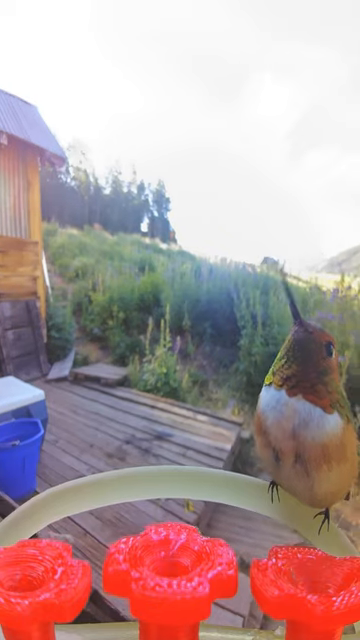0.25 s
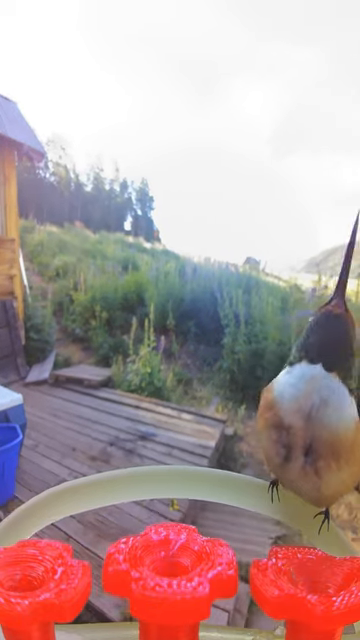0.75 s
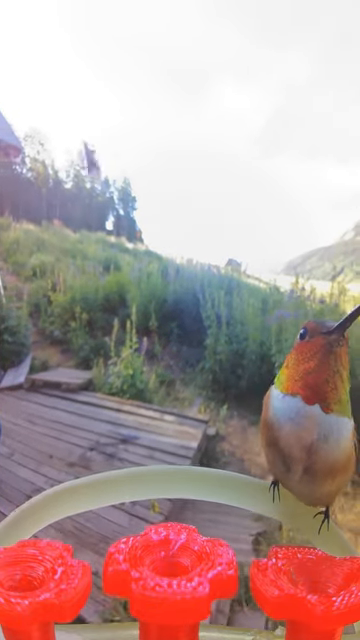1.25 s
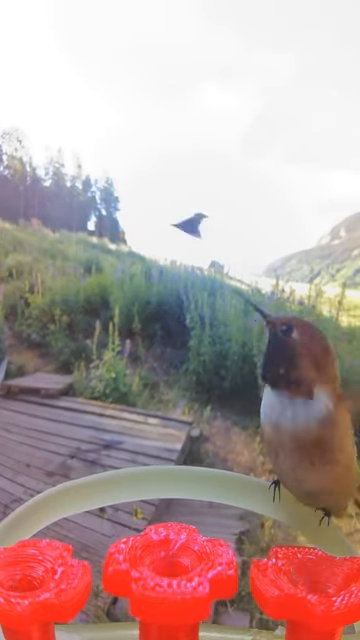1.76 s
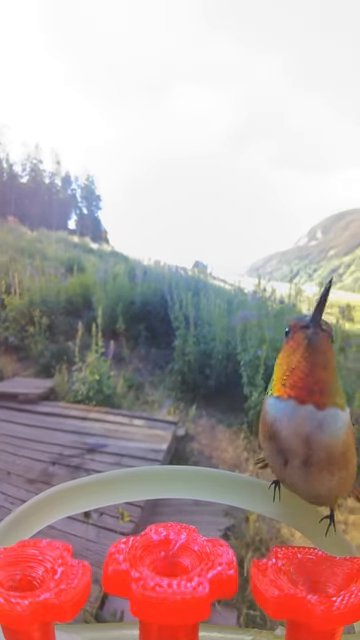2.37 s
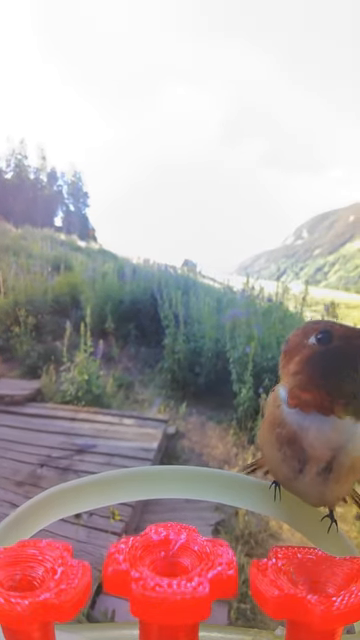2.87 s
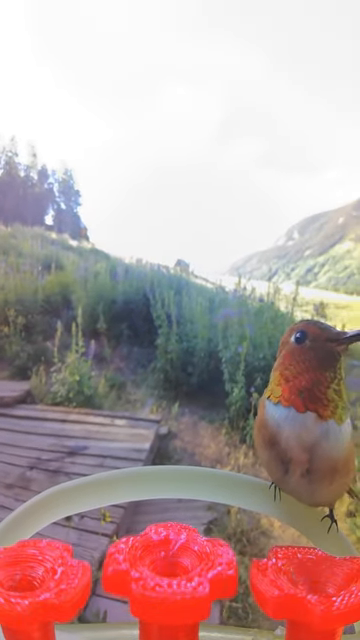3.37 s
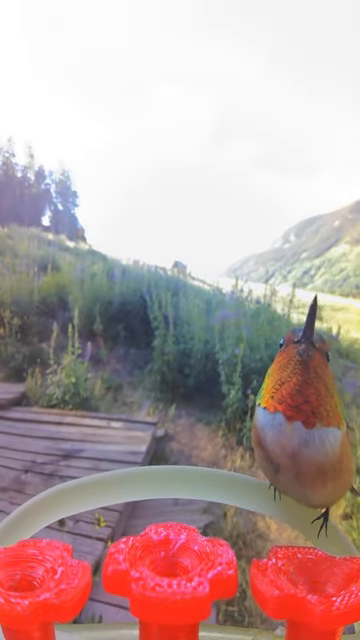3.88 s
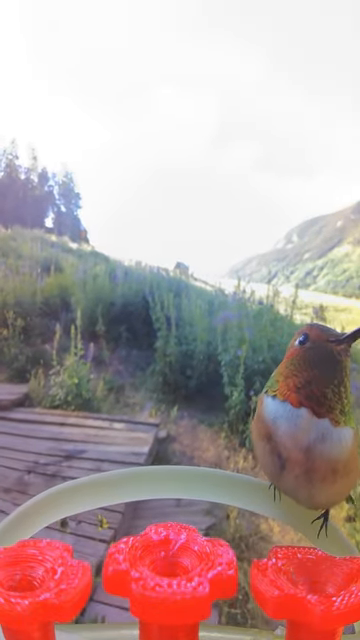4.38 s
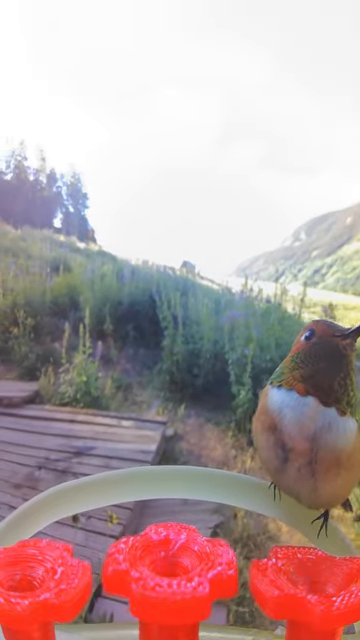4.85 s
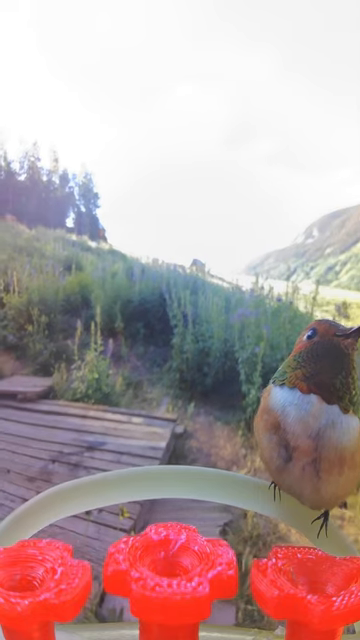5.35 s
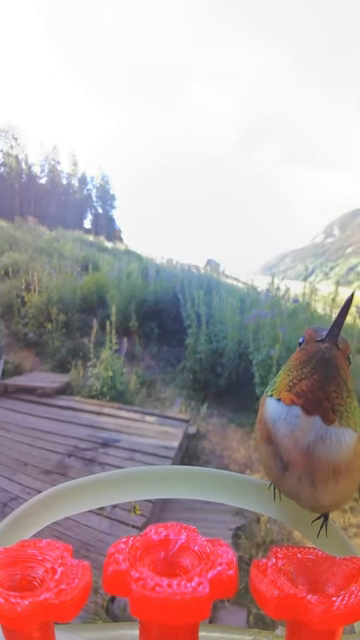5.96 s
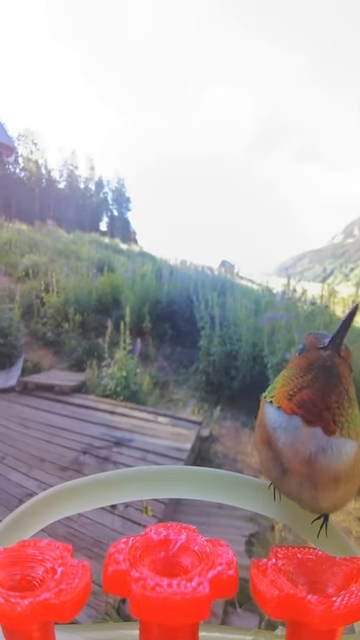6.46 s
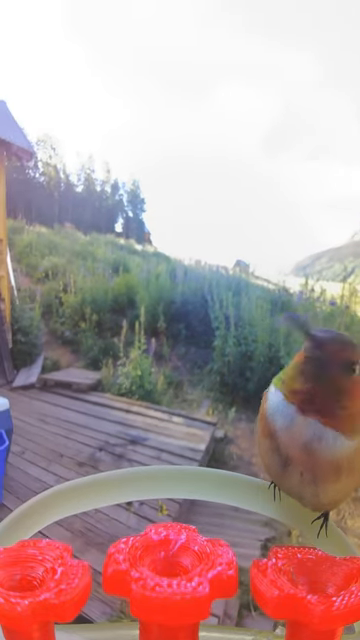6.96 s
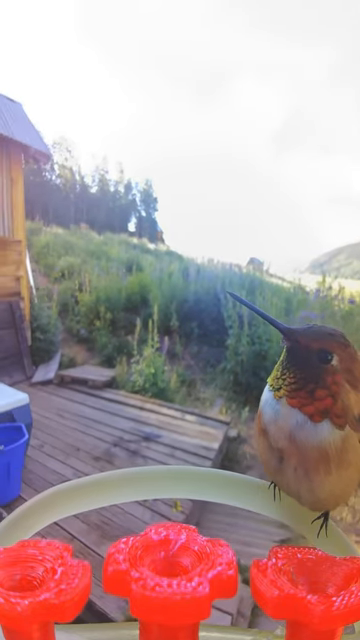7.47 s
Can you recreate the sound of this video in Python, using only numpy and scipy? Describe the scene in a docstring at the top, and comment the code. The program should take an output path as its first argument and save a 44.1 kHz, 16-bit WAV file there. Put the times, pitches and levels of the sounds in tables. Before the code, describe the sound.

A hummingbird perched close by bursts into a piercing trill, buzzes, rattling ticks and falling chirps as rivals whir past, then quiet garden chips remain.

```python
"""Distant chips and high, pulsing wing whistles come first: rival hummingbirds flying around a garden feeder.
The bird perched by the microphone then gives a trill and a burst of buzzes, whistles, ticks and falling chirps:
one syrinx tone sweeping through a fixed throat resonance. Close rivals whistle one pip a wingbeat and push a
fluttering draught of air; others fly and call farther off, with more echo, over a faint background hiss."""
import sys
import numpy as np
from scipy import signal
from scipy.fft import rfft, irfft, next_fast_len
from scipy.io import wavfile
from scipy.ndimage import uniform_filter1d, map_coordinates

SR = 44100
rng = np.random.default_rng(int(sys.argv[2]) if len(sys.argv) > 2 else 0)


def generate_wav(sig):
    """Save sig (samples, or channels by samples) to the path in sys.argv[1] as 16-bit PCM at SR."""
    pcm = np.round(np.clip(np.atleast_2d(sig).T, -1, 1) * 32767).astype(np.int16)
    wavfile.write(sys.argv[1], SR, pcm)


N = 340452
T = np.arange(N) / SR

# The close trill, starting at the bottom of a warble swing: t/s, f/Hz, effort level/dB, warble depth f/Hz
TRILL = [(1.8385, 7900, -26, 1500), (1.8485, 8100, -14, 1550), (1.868, 8250, -9.5, 1550),
         (1.90, 8350, -10, 1550), (1.99, 8400, -10, 1450), (2.02, 8200, -14, 1500),
         (2.033, 7950, -19, 1550)]
# Syllables that curve through the high register, then break and plunge: break t/s, lead before it t/s,
# tail after it t/s, start f/Hz, top f/Hz, f/Hz at the break, place of the top (0-1),
# warble depth f/Hz at the top, effort level/dB
SYLLABLES = [(2.1205, .0115, 0.025, 7010, 5890, 4600, 0.34, -1.5, -9.5),
             (2.1895, 0.033, 0.0016, 2212, 5900, 5700, 0.81, 1049.5, -10.5),
             (2.2849, 0.051, 0.028, 6300, 7660, 6300, 0.54, 1149.5, -11),
             (2.4796, 0.049, 0.0073, 6780, 6848, 5100, .36, 31, -11.5),
             (2.6268, .0205, .018, 7200, 7270, 6080, 0.4, 800, -11),
             (2.861, 0.044, 0.0021, 6620, 6780, 5200, .4, 60, -10.5),
             (3.0669, 0.07, 0.0042, 6513, 7630, 6000, .44, 950.5, -11.5)]
# Chirps that flick up from the low register and sag: top t/s, lead t/s, tail t/s, top f/Hz, low f/Hz,
# flick width t/s, effort level/dB
CHIRPS = [(2.153, 0.013, .008, 5230, 1756, .005, -10), (2.3753, 0.0033, 0.034, 3640, 1834, .0037, -11),
          (2.652, 0.014, 0.028, 2810, 1858, 0.006, -10), (2.761, .003, 0.03, 3310, 1843, 0.0044, -15.5),
          (3.1232, 0.0052, 0.041, 4018, 1960, 0.0028, -8.5)]
# Ticks of the two rattles: t/s, effort level/dB before tick_db
TICKS = [(2.5253, -21.5), (2.534, -7.5), (2.544, -6), (2.5545, -7.5), (2.9106, -23.5), (2.9174, -7),
         (2.9294, -7), (2.9399, -5), (2.95, -10)]
# Dry clicks between syllables: t/s, level/dB before click_db
CLICKS = [(2.028, -37), (2.224, -37), (2.228, -35), (2.498, -34), (2.924, -33), (2.96, -38), (2.99, -32),
          (2.993, -54), (3.109, -31)]
# Spectrum of the rasp, also lent to the wing swish: f/Hz, level/dB
RASP_COLOUR = [(800, -63.5), (1350, -40), (2000, -10), (3500, -6.5), (5000, 0.5), (6800, -4), (8500, -13),
               (11000, -15.5), (15000, -24)]


def perched_bird(tick_db=2, rasp_db=-14, click_db=1, harsh_hz=5900, whistle_rasp=0.23):
    """The close voice, with noise that follows its loudness and bites hardest below harsh_hz."""
    trill, chatter, clicks = np.zeros((3, N))
    trill_call = warbled(*contour(TRILL), 100.0, warble_jitter=.007, lean=.08)
    add(trill, TRILL[0][0], trill_call)
    for s, lead, *shape in SYLLABLES:
        add(chatter, s - lead, syllable(lead, *shape))
    for s, lead, *shape in CHIRPS:
        add(chatter, s - lead, chirp(lead, *shape))
    for s, db in TICKS:
        add(chatter, s, tick(db + tick_db))
    for s, db in CLICKS:
        clicks += amp(db + click_db) * np.exp(-np.abs(T - s) / .0015)
    voice = throat(chatter)
    harsh = filtered(voice, lambda hz: whistle_rasp + 1 / (1 + (hz / harsh_hz) ** 20))
    rasp_level = amp(rasp_db) * envelope(harsh, size=520)
    rasp = (rasp_level + clicks) * noise(RASP_COLOUR)
    trill = throat(trill)
    # the bright trill glances off the feeder just behind the bird
    return voice + rasp + trill + garden(trill, wet_db=-10, t60=.03)


BREAK_S, BREAK_DB = 0.0011, 2  # time scale of the plunge; height of the push before it
ACCENT_S, ACCENT_LEAD_S = .002, .001  # length of that push and its lead on the break
TIRE_DB = 11.5  # a buzz weakens past its top, by this much times its relative depth
# the low register starts high by LOW_EXTRA_HZ and settles after the break
LOW_HZ, LOW_EXTRA_HZ, LOW_SETTLE_S, LOW_DB = 1777, 704, .006, -1.5


def syllable(lead, tail, start_hz, top_hz, brink_hz, top_at, depth, db, buzz_hz=303, calm_s=.006):
    """A high-register curve; the warble dies away, the voice breaks and lands in the low register."""
    t = np.arange(-lead, tail, 1 / SR)
    top_s = -lead * (1 - np.clip(top_at, .05, .95))
    # place on the curve: -1 at the start, 0 at the top, 1 at the break
    u = np.interp(t, [-lead, top_s, 0], [-1, 0, 1])
    high = top_hz - (top_hz - np.where(u < 0, start_hz, brink_hz)) * u ** 2
    low = LOW_HZ + LOW_EXTRA_HZ * np.exp(-np.maximum(t, 0) / LOW_SETTLE_S)
    broken = (1 + np.tanh(t / BREAK_S / 2)) / 2
    accent_db = BREAK_DB * np.exp(-((t + ACCENT_LEAD_S) / ACCENT_S) ** 2)
    tiring_db = TIRE_DB * depth / top_hz * np.clip(u, 0, 1) * (t < -calm_s)
    effort_db = db + edges_db(t) + LOW_DB * broken + accent_db - tiring_db
    calming = 1 - np.exp(-(np.minimum(t, 0) / calm_s) ** 2)
    warble = depth * (high / top_hz) ** 1.5 * calming
    pitch = high + (low - high) * broken
    return warbled(pitch, effort_db, warble, buzz_hz, warble_jitter=.02)


SAG_HZ_PER_S, FADE_DB_PER_S = 15000, 170


def chirp(lead, tail, top_hz, low_hz, width, db):
    """A quick flick of pitch on a low note that sags and fades."""
    t = np.arange(-lead, tail, 1 / SR)
    after = np.maximum(t, 0)
    flick = (top_hz - low_hz) / (1 + (t / width) ** 2)
    pitch = low_hz - SAG_HZ_PER_S * after + flick
    effort_db = db + edges_db(t) - FADE_DB_PER_S * after
    return warbled(pitch, effort_db, 0, 0, low_jitter=0.041)


def tick(effort_db, fall=0.002, fade_db=2.5):
    """The pitch plunges from above the throat resonance to the low register within a few ms."""
    t = np.arange(0, .006, 1 / SR)
    pitch = 2000 + 4500 * np.exp(-t / fall)
    return syrinx(pitch, effort_db - fade_db * t / fall, jitter=.035)


def warbled(pitch, effort_db, depth, warble_hz, jitter=0.0075, low_jitter=0.045, warble_jitter=.014, lean=.1):
    """One call: a pitch contour with a fast warble that dips sharply and lingers at the top."""
    t = np.arange(len(pitch)) / SR
    cycle = 2 * np.pi * warble_hz * t + .2 * wobble(60, len(t))
    swing = np.cos(cycle) + lean * np.cos(2 * cycle)
    uneven_depth = depth * (1 + .06 * wobble(100, len(t)))
    # high whistles are steady; low notes and deep warbles are rough
    rough = jitter + low_jitter / (1 + (pitch / 5000) ** 8) + warble_jitter * depth / 1000
    return syrinx(pitch - uneven_depth * swing, effort_db, rough)


def syrinx(pitch, effort_db, jitter=.012, shimmer_db=60, rolloff=1.56, even_db=-4, count=6):
    """A tone with overtones, before any throat colour; the rougher its pitch, the more its level shakes."""
    n = len(pitch)
    pitch = pitch * (1 + jitter * wobble(1500, n))
    phase = turns(pitch)
    tone = np.zeros(n)
    for k in range(1, count + 1):
        treble_cut = 1 + (k * pitch / 13000) ** 10
        tone += amp(even_db * (k % 2 == 0)) * np.sin(k * phase) / k ** rolloff / treble_cut
    edges = signal.windows.tukey(n, min(2 * SR / 1000 / n, 1))  # 1 ms fades
    level_db = effort_db + shimmer_db * jitter * wobble(1200, n)
    return np.sqrt(2) * tone * edges * amp(level_db)


# how long and how deep each note swells in and sinks away
ATTACK_S, ATTACK_DB, RELEASE_S, RELEASE_DB = 0.0056, 23.5, 0.0045, 14


def edges_db(t):
    """Attack, hold and release of a note."""
    attack = np.clip(1 - (t - t[0]) / ATTACK_S, 0, 1) ** 2
    release = np.clip(1 - (t[-1] - t) / RELEASE_S, 0, 1)
    return -ATTACK_DB * attack - RELEASE_DB * release


# Resonance of throat and bill: f/Hz, level/dB
THROAT = [(500, -68.5), (900, -50), (1300, -35), (1700, -24), (2400, -21.5), (3500, -18.5), (4300, -10),
          (5000, 0.5), (5800, -4), (6800, -7), (7800, -16), (9800, -20.5), (11000, -27), (15000, -38.5)]


def throat(x):
    """The throat as a causal filter: it rings briefly after each fast sweep."""
    m = next_fast_len(N + SR // 2) // 2 * 2
    gain = amp(along(THROAT, np.fft.rfftfreq(m, 1 / SR)))
    # folding the cepstrum forward in time gives minimum phase
    cepstrum = irfft(np.log(gain), m)
    cepstrum[1:m // 2] *= 2
    cepstrum[m // 2 + 1:] = 0
    return irfft(rfft(x, m) * np.exp(rfft(cepstrum)), m)[:N]


# Rivals darting close by: nearest t/s, wingbeat f/Hz, approach t/s, retreat t/s, whistle level/dB,
# whistle f/Hz, draught level/dB before the draught's own trims
FLYBYS = [(.01, 44, .02, 0.035, -66, 6150, -70), (.676, 44, .004, .025, -47, 6510, -95),
          (1.086, 42, .06, 0.027, -36.5, 6400, -79), (1.197, 37.5, .035, 0.12, -35.5, 6090, -78),
          (1.654, 43, .028, .035, -28, 6430, -72.5), (1.723, 41, 0.053, 0.039, -29, 6430, -65.5),
          (1.793, 45, .05, .12, -28.5, 6290, -71.5), (2.33, 42, 0.0086, 0.022, -36.5, 6170, -69),
          (2.802, 41, .1, .01, -28, 6080, -69), (3.063, 44, 0.061, .05, -49, 6150, -75.5),
          (3.251, 43, 0.053, 0.084, -49, 6020, -81), (3.661, 42, 0.033, .02, -44, 5970, -94)]


def near_wings(width=0.0027, droop=0.034, swish_db=-20, count=10):
    """Each downstroke makes the wing-tip feathers whistle, sagging in pitch as the stroke ends."""
    out, t = np.zeros(N), np.arange(-SR // 100, SR // 100) / SR
    for s, beat_hz, approach, retreat, db, hz, _ in FLYBYS:
        for beat in np.arange(-count, count + 1) / beat_hz:
            pitch = hz * (1 - droop * np.tanh(t / width) + 0.0053 * wobble(640, len(t)))
            stroke_db = db + passing_db(beat, approach, retreat) + 1.8 * wobble(440, len(t))
            stroke = amp(stroke_db) / np.cosh(np.minimum((t / width) ** 2, 50))
            start = s + beat + t[0]
            if start > 0:
                add(out, start, np.sqrt(2) * stroke * np.sin(turns(pitch)))
    return out + amp(swish_db) * envelope(out, size=100) * noise(RASP_COLOUR)


PASS_DB = 10.5  # drop over one approach or retreat time


def passing_db(t, approach, retreat):
    """Level of a flyby, t seconds after its nearest point."""
    return -PASS_DB * np.maximum(-t / approach, t / retreat)


# Wingbeat overtones in the draught: multiple of the beat, level/dB relative to each other
HUM = [(2, -4), (3, -12), (4, 2.5), (5, -7)]
# Spectrum of the draught's flutter: f/Hz, level/dB
DRAUGHT_COLOUR = [(20, -14.5), (80, -3), (190, 6), (400, -4.5), (1000, -30.5), (3000, -76.5)]
DRAUGHT_LINGER_S, STILL_DB = 0.058, -93.5  # added to approach and retreat; floor before trims and drift


def draught(beat_hz=44, throb_db=4, level_db=-3, hum_db=-7, drift_db=3):
    """Air pushed by passing wings hums and flutters at the microphone, swelling with each flyby."""
    push = amp(STILL_DB + drift_db * wobble(6, N))
    for s, _, approach, retreat, _, _, db in FLYBYS:
        pass_db = passing_db(T - s, approach + DRAUGHT_LINGER_S, retreat + DRAUGHT_LINGER_S)
        push = np.maximum(push, amp(db + pass_db))
    beat = turns(beat_hz * (1 + .03 * wobble(2.8, N)))
    hum = sum(amp(level + 3 * wobble(8, N)) * np.sin(k * beat) for k, level in HUM)
    flutter = unit(noise(DRAUGHT_COLOUR) * amp(throb_db * np.sin(beat)))
    return push * (amp(level_db) * flutter + amp(hum_db) * unit(hum))


# Flights farther off: nearest t/s, swell half length t/s, level/dB, whistle f/Hz
FAR_FLIGHTS = [(0.175, 0.17, -71.5, 6100), (0.475, 0.045, -68.5, 6330), (0.729, 0.031, -64, 6500),
               (0.898, .04, -65, 5920), (1.02, 0.042, -53, 6490), (1.313, 0.044, -48, 6210),
               (1.617, .03, -50, 6470), (3.25, 0.063, -60.5, 6060), (3.679, 0.048, -56.5, 6000),
               (3.809, 0.04, -62.5, 6330), (3.99, 0.064, -68.5, 6150), (4.3, .06, -68.5, 6110),
               (4.568, .02, -69, 6430), (4.94, .12, -68.5, 6160), (5.35, 0.15, -65, 6350),
               (5.717, .06, -68, 6040), (6.37, 0.15, -73, 6180), (6.73, 0.097, -69, 6120),
               (7.29, 0.042, -65, 5960), (7.386, 0.058, -59.5, 6390), (7.658, 0.046, -64, 6070)]


def far_wings(beat_hz=45, pulse_db=10.0, uneven_db=3, spread=0.015):
    """Each far flight swells and fades, its whistle pulsing unevenly at its own drifting wingbeat."""
    out = np.zeros(N)
    for s, half, db, hz in FAR_FLIGHTS:
        t = np.arange(-min(s, .5), .5, 1 / SR)
        n = len(t)
        beat = turns(beat_hz * (1 + 0.042 * wobble(6.3, n)))
        pitch = hz * (1 + spread * wobble(40, n) - .015 * np.sin(beat) + .014 * wobble(600, n))
        pulses_db = pulse_db * np.cos(beat) + uneven_db * wobble(90, n)
        whistle = unit(np.sin(turns(pitch)) * amp(pulses_db))
        add(out, s + t[0], amp(db) * whistle / np.cosh(t / half))
    return out


# Far chips: t/s, peak level/dB before chip_db and the throat, pitch fall t/s
CHIPS = [(0.359, -48.5, 0.021), (0.439, -50, 0.012), (0.602, -55.5, 0.017), (.709, -51.5, .015),
         (.948, -45, 0.017), (1.0063, -46.5, 0.019), (1.078, -43, 0.011), (1.6722, -33.5, 0.024),
         (3.2838, -38, .015), (3.366, -37.5, 0.014), (3.821, -41, 0.013), (3.876, -49, 0.015),
         (4.0, -50, 0.01), (4.0906, -38.5, .012), (4.3427, -45.5, 0.019), (4.465, -54, .011),
         (4.634, -48, 0.0082), (4.686, -43.5, 0.013), (4.7138, -43, 0.01), (5.326, -43, .015),
         (5.4521, -49, .011), (5.6017, -49, 0.011), (5.849, -41.5, .017), (5.956, -40.5, 0.0089),
         (6.063, -43, 0.0075), (6.2574, -43.5, 0.018), (6.325, -44.5, .016), (6.6214, -50.5, 0.012),
         (6.6923, -50.5, 0.0091), (6.802, -54, .015)]
# Far buzzes and pips on one pitch: t/s, length t/s, f/Hz, effort level/dB before buzz_db, warble depth f/Hz
FAR_BUZZES = [(4.339, 0.014, 4810, -42.5, 60), (5.702, 0.11, 4628, -51.5, 170.9),
              (6.18, 0.089, 4590, -53.5, 140), (7.066, 0.02, 4790, -51.5, 119),
              (7.357, 0.11, 4460, -57, 550)]
# A far trill: t/s, f/Hz, effort level/dB, warble depth f/Hz
FAR_TRILL = [(1.494, 8100, -44.5, 1117), (1.57, 8210, -40, 1143), (1.609, 8000, -46, 1160)]
# A faint far whistle: t/s, f/Hz, level/dB of its sine peak
THIN_NOTE = [(4.7, 3620, -84.5), (4.8, 3600, -87), (5.1, 3530, -76), (5.25, 3590, -90)]


def far_birds(chip_db=2.0, buzz_db=-1):
    """Chips, short buzzes and a trill through the throat, plus a thin sine note, from around the garden."""
    out = np.zeros(N)
    for s, db, fall in CHIPS:
        add(out, s, amp(db + chip_db) * chip(fall))
    for s, length, hz, db, depth in FAR_BUZZES:
        swell = signal.windows.cosine(int(length * SR))
        pitch = np.full(len(swell), hz)
        add(out, s, swell * warbled(pitch, db + buzz_db, depth, 110, low_jitter=0.033))
    add(out, FAR_TRILL[0][0], warbled(*contour(FAR_TRILL), 110, warble_jitter=.004))
    hz, db = curves(THIN_NOTE, T)
    sounding = (T > THIN_NOTE[0][0]) & (T < THIN_NOTE[-1][0])
    thin_note = sounding * amp(db) * np.sin(turns(hz * (1 + .004 * wobble(80, N))))
    return throat(out) + thin_note


def chip(fall, flutter_db=3, fade_db=90, end_hz=2700, drop_hz=2400, scatter_hz=90):
    """A falling chip of peak 1, each at its own pitch, its level fluttering as it fades."""
    t = np.arange(0, .03, 1 / SR)
    start, end = rng.standard_normal(2)
    drop = (drop_hz + scatter_hz * start) * np.exp(-t / max(fall, .002))
    pitch = end_hz + scatter_hz * end + drop
    effort_db = flutter_db * wobble(300, len(t)) - fade_db * t  # fade in dB a second
    sweep = syrinx(pitch, effort_db, jitter=.055, rolloff=4)
    return sweep / np.abs(sweep).max()


def garden(x, wet_db, t60):
    """Scattered echoes from the feeder, deck, cabin wall and bushes, as a decaying noise tail."""
    t = np.arange(SR) / SR
    tail = rng.standard_normal(SR) * amp(-60 * t / t60) * (1 - np.exp(-t / .004))
    return amp(wet_db) * signal.fftconvolve(x, tail / np.linalg.norm(tail))[:N]


def ring(x, hz=4790, width_hz=380):
    """A resonant bandpass: only a narrow band of the far calls' long echo remains."""
    return filtered(x, lambda f: 1j * f * width_hz / (hz ** 2 - f ** 2 + 1j * f * width_hz))


# Level of the background hiss: t/s, level/dB before level_db
HISS = [(0, -77.5), (.25, -79), (1.2, -78), (1.58, -79), (1.65, -71), (2.3, -66.5), (3.15, -66.5),
        (3.3, -72), (3.55, -78), (5.5, -78.5), (7.72, -78.5)]
# Spectrum of the background hiss: f/Hz, level/dB
HISS_COLOUR = [(24, -65.5), (40, -37.5), (91, -20.5), (156, -17.5), (364, -6.5), (956, -8), (2010, -9),
               (2390, -9.5), (4130, -7.5), (4790, -3.5), (5560, -10), (6140, -1.5), (7130, -9.5),
               (13900, -11.5), (15000, -23)]


def background_hiss(level_db=10):
    """A soft background hiss of coloured noise, heard louder during the squabble."""
    db, = curves(HISS, T)
    return amp(db + level_db) * noise(HISS_COLOUR)


def amp(db):
    """Decibels to gain."""
    return 10 ** (np.asarray(db) / 20)


def unit(x):
    """x at rms 1."""
    return x / np.sqrt(np.mean(x ** 2) + 1e-20)


def along(points, hz):
    """(f/Hz, value) points read on a log frequency axis."""
    f, v = np.transpose(points)
    return np.interp(np.log(hz + 1), np.log(f + 1), v)


def curves(rows, t):
    """Each column after the time, read at the times t."""
    s, *cols = np.transpose(sorted(rows))
    return [np.interp(t, s, c) for c in cols]


def contour(rows):
    """Pitch, effort and warble depth of a trill, sample by sample."""
    return curves(rows, np.arange(min(rows)[0], max(rows)[0], 1 / SR))


def wobble(rate, n):
    """A smooth random curve of n samples, rate knots a second."""
    knots = rng.standard_normal(int(n * rate / SR) + 4)
    return map_coordinates(knots, [np.arange(n) * rate / SR])


def filtered(x, response):
    """x times a response of frequency."""
    m = next_fast_len(N + SR // 2)
    return irfft(rfft(x, m) * response(np.fft.rfftfreq(m, 1 / SR)), m)[:N]


def noise(colour):
    """Noise of rms 1 with the given spectrum."""
    return unit(filtered(rng.standard_normal(N), lambda hz: amp(along(colour, hz))))


def turns(hz):
    """Running phase, in radians, of a frequency curve."""
    return 2 * np.pi * np.cumsum(hz) / SR


def add(track, s, x):
    """Mix x into the track at time s."""
    part = track[max(round(s * SR), 0):][:len(x)]
    part += x[:len(part)]


def envelope(x, size):
    """Running rms over size samples."""
    return np.sqrt(np.abs(uniform_filter1d(x ** 2, size)))


def scene():
    """The close bird is nearly dry; the farther ones come with more echo."""
    close = perched_bird()
    wings = near_wings() + far_wings()
    far = far_birds()
    echoes = garden(close, wet_db=-15, t60=.025) + garden(close, wet_db=-24, t60=0.45)
    echoes += garden(wings, wet_db=-10, t60=0.3)
    echoes += garden(far, wet_db=-5, t60=0.08) + ring(garden(far, wet_db=-5, t60=0.66))
    return (close + wings + far + echoes + draught() + background_hiss())[None]


TOP_HZ = 15300


def record(dry):
    """A sharp band limit: nothing is kept from TOP_HZ up."""
    return filtered(dry[0], lambda hz: hz < TOP_HZ)[None]


dry = scene()
out = record(dry)
generate_wav(out)
```